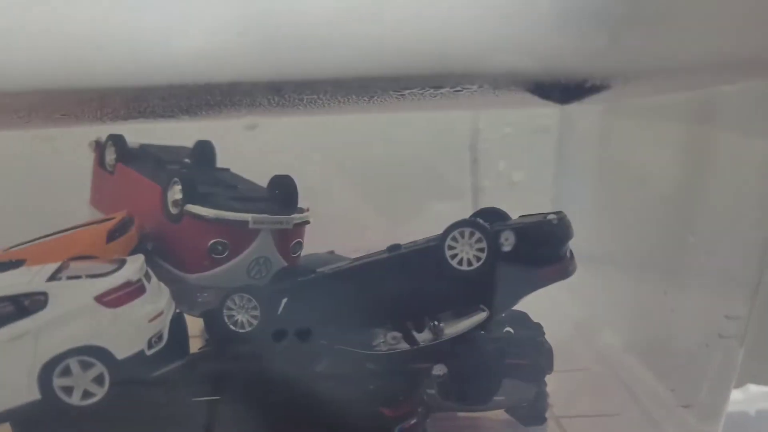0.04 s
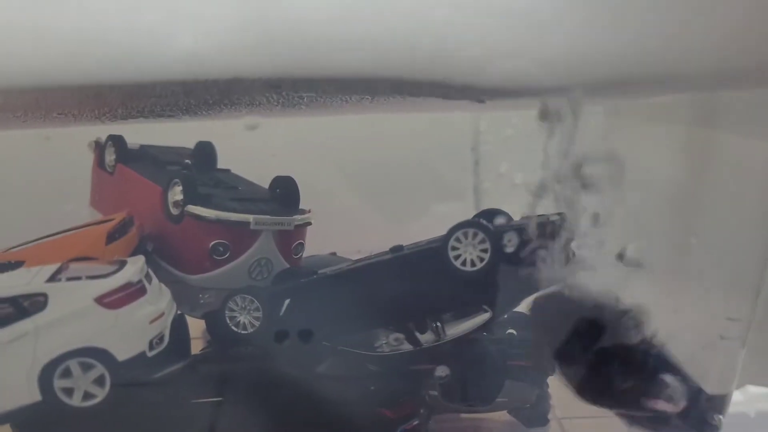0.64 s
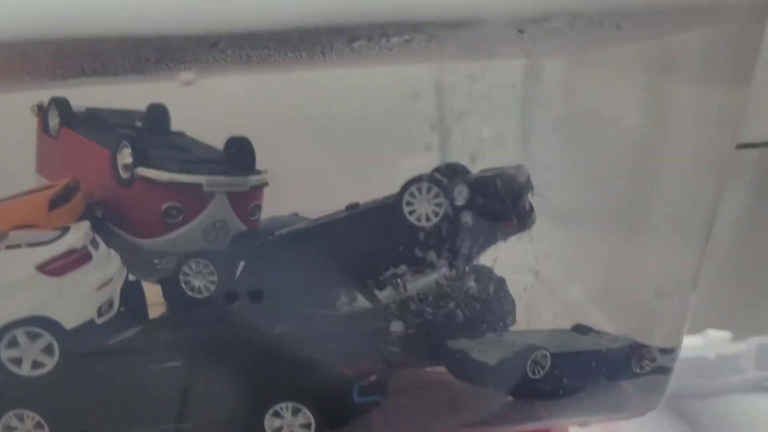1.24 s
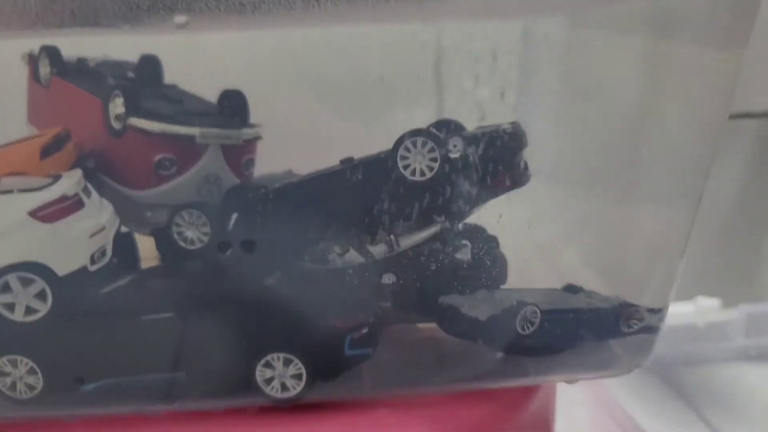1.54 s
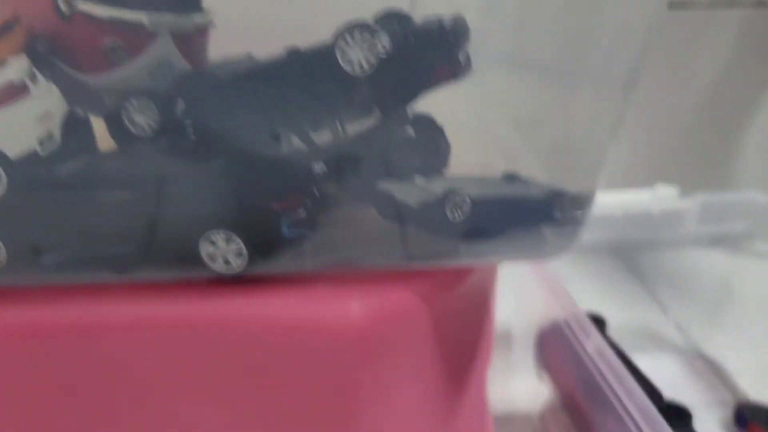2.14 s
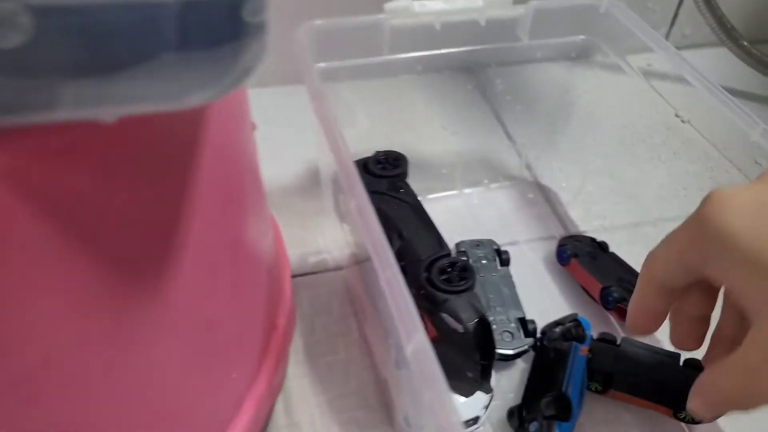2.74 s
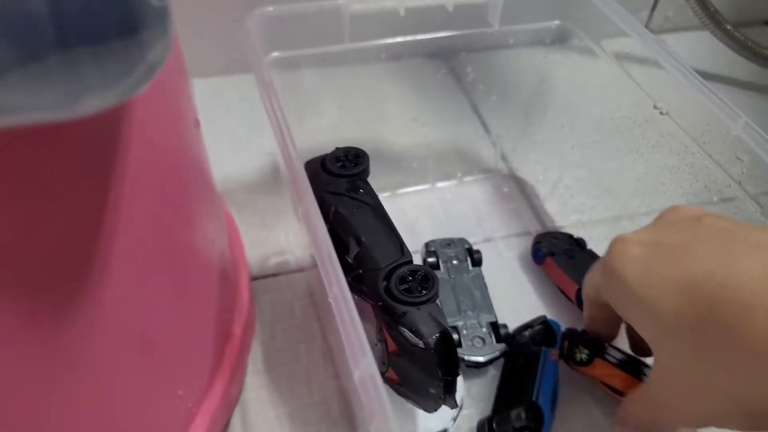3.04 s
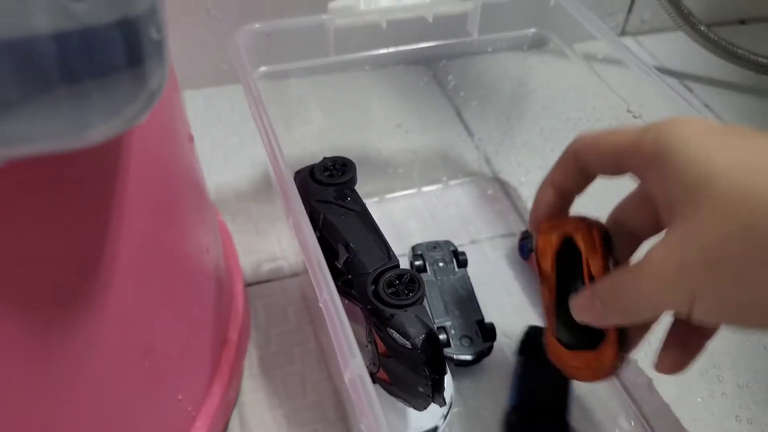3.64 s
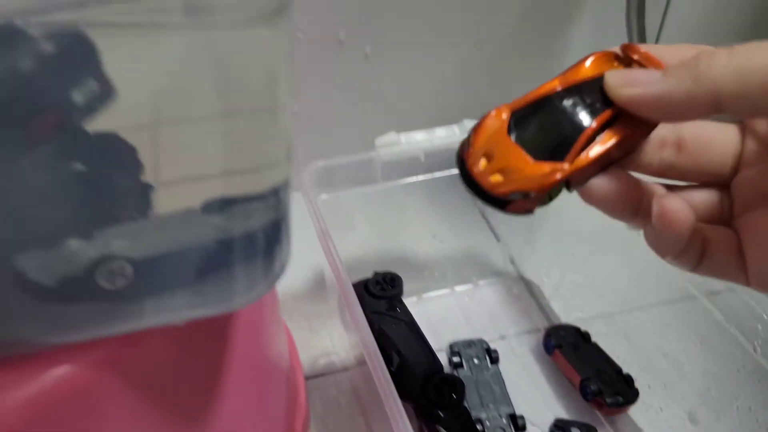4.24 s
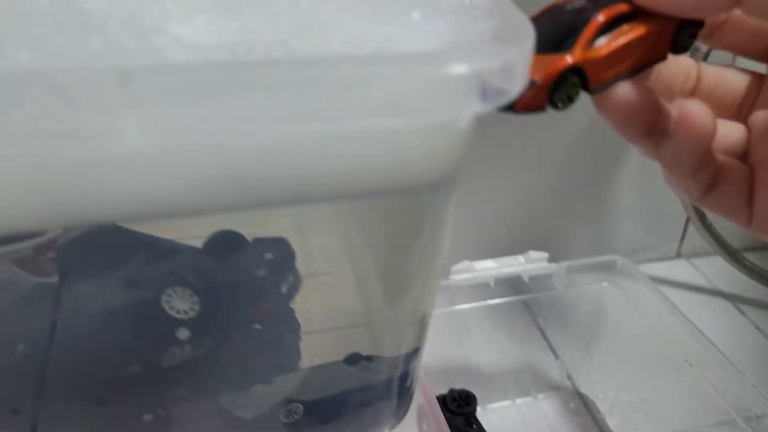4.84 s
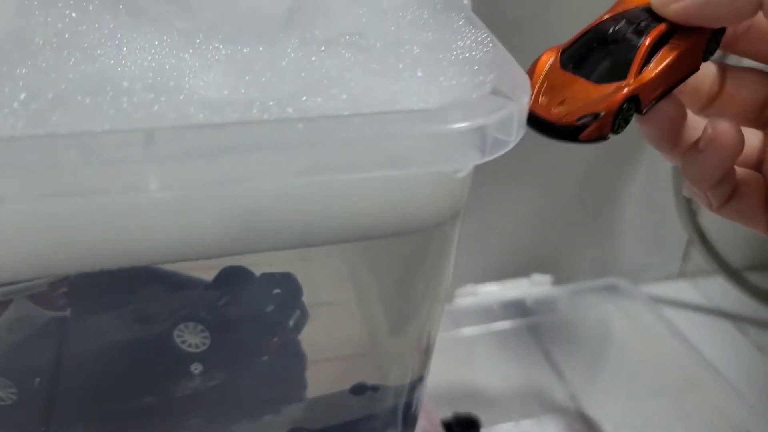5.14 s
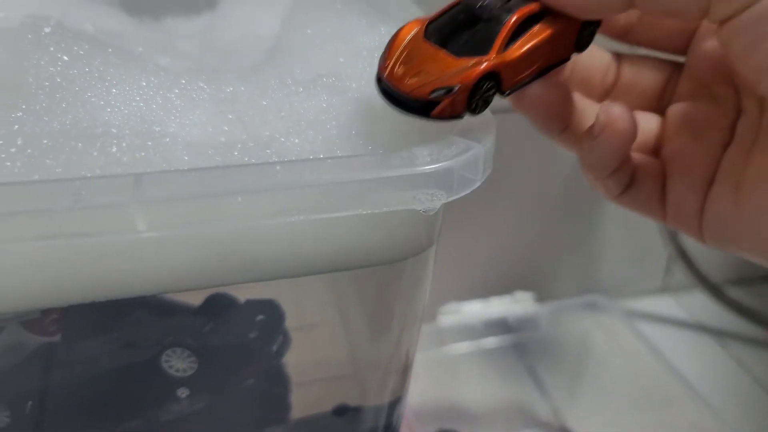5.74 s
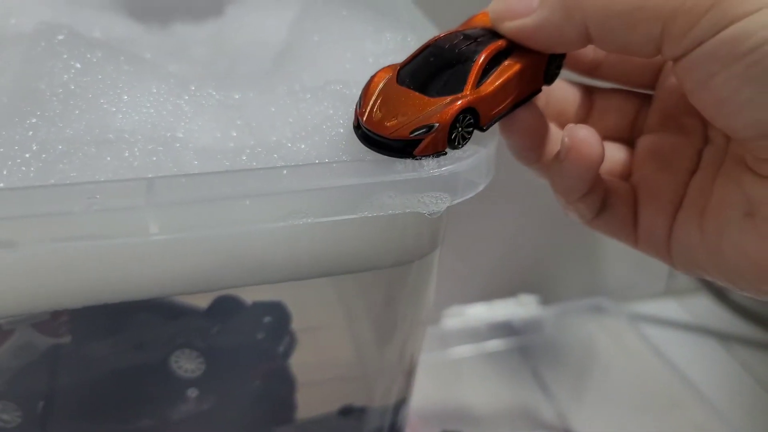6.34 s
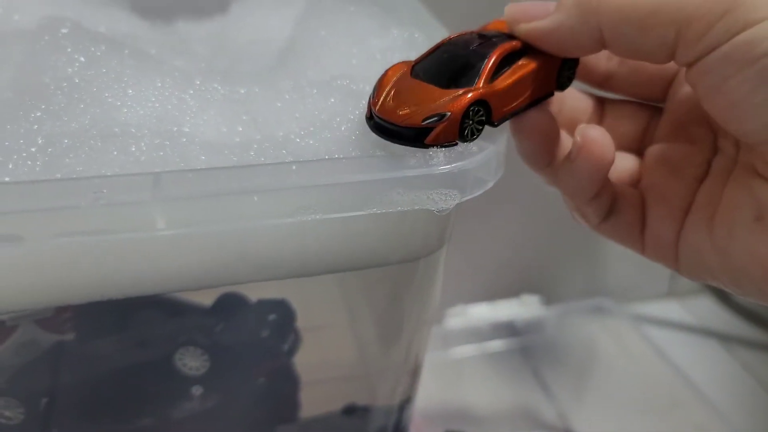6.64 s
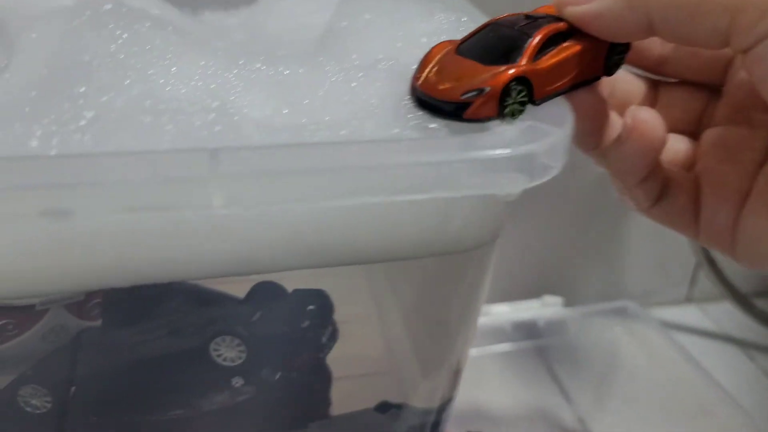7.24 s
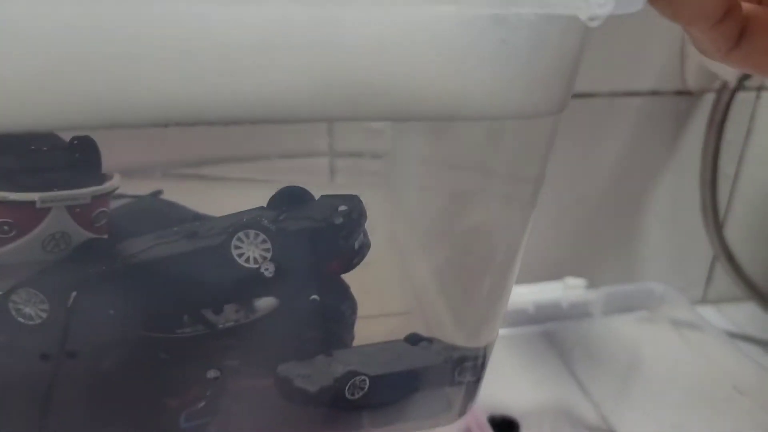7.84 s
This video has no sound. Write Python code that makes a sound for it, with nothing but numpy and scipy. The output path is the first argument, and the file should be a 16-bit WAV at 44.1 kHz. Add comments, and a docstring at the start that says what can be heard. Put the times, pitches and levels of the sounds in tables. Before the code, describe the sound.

Close up in a small tiled room with a faint low hum, a die-cast toy car bumps its way down a plastic tub of water, making short, booming knocks, the loudest sounds here. A quieter run of irregular clacks and scrapes follows as another car is picked out from others in a plastic tray. It ends with sparse, light ticks and brief pings of the metal car touching the tub's edge.

```python
"""Toy cars in a tub and a tray

A die-cast car drops into a plastic tub of foamy water and knocks its way down: the wall booms, air
pockets throb. Another is picked from a shallow plastic tray, which rattles on the floor, then tapped
and scuffed along the tub's rim, its metal shell pinging. Foam fizzes; a motor hums in a small tiled room."""
import sys
import numpy as np
from scipy import signal
from scipy.fft import rfft, irfft
from scipy.io import wavfile

SR = 44100
rng = np.random.default_rng(int(sys.argv[2]) if len(sys.argv) > 2 else 0)


def put_to_file(sound):
    """Save the sound as 16-bit audio at rate SR, in the file named by the first command-line argument."""
    columns = np.atleast_2d(sound).T  # one column per channel
    safe = np.clip(columns, -1, 1)
    whole_steps = np.round(safe * 32767)
    wavfile.write(sys.argv[1], SR, whole_steps.astype(np.int16))


N = 356769

# underwater blows on the tub:
# (time [s], clack [dB], knock [dB], tick [dB], spot pitch [Hz], rattle [s], wall boom [dB])
TUB_HITS = [(0.6251, -41, -41.5, -59.5, 1600, .001, -30), (0.672, -45.5, -38, -60, 1700, .001, -34),
            (0.7108, -35.5, -33, -47.5, 1670, .001, -21), (0.7422, -33, -26, -47.5, 1480, 0.0016, -7),
            (0.752, -44, -28.5, -51, 520, 0.0057, -32), (0.865, -47.5, -38, -65, 1620, 0.0017, -18),
            (0.872, -49, -33, -61.5, 500, 0.0062, -33), (1.0688, -57, -38, -86, 2700, .002, -18),
            (1.118, -76, -54, -94, 735, .002, -31.5)]
# finger-damped metal shell: (frequency [Hz], level [dB], t60 [s])
SHELL_MODES = [(2330, -2.5, .04), (2670, -8, .04), (3110, 2, .04), (3480, -7.5, .035), (5050, -1, .022),
               (5480, 0, .028)]


def amp(db):
    return 10 ** (np.asarray(db) / 20)


def unit_rms(x):
    return x / np.sqrt(np.mean(x ** 2) + 1e-20)


def curve_at(points, hz):
    point_hz, value = np.transpose(points)
    return np.interp(np.log(hz + 1), np.log(point_hz), value)


def add(mix, start_s, sound):
    part = mix[:, round(start_s * SR):][:, :sound.shape[1]]
    part += sound[:, :part.shape[1]]


def band(x, hz, kind, order=3):
    return signal.sosfilt(signal.butter(order, hz, kind, fs=SR, output="sos"), x)


def stereo_noise(size, coherence):
    left, other = rng.standard_normal((2, size))
    return np.array([left, coherence * left + np.sqrt(1 - coherence ** 2) * other])


def drift(rate_hz, size=4096):
    """Slow random curve, unit RMS."""
    hz = np.fft.rfftfreq(size, N / SR / size)
    slow = irfft(rfft(rng.standard_normal(size)) * np.exp(-(hz / rate_hz) ** 2), size)
    return unit_rms(np.interp(np.arange(N) * size / N, np.arange(size), slow))


def octave_decay(x, t60_at, drive=None):
    """Each octave of x is fed by drive (default: an impulse) and decays in t60_at(hz) seconds."""
    size = x.shape[1]
    drive = signal.unit_impulse(size) if drive is None else drive
    log_hz = np.log(np.fft.rfftfreq(size, 1 / SR) + 1)
    centres_hz = np.geomspace(125, 16000, 8)
    spectrum, out = rfft(x), 0
    for hz, selector in zip(centres_hz, np.eye(len(centres_hz))):
        octave = irfft(spectrum * np.interp(log_hz, np.log(centres_hz), selector), size)
        pole = np.exp(-2 * np.log(1000) / (SR * t60_at(hz)))
        out = out + octave * np.sqrt(signal.lfilter([1], [1, -pole], drive ** 2))
    return out


def minimum_phase(x, gain_points):
    """Causal filter: nothing sounds ahead of the blow."""
    size = x.shape[1]
    log_gain = np.log(amp(curve_at(gain_points, abs(np.fft.fftfreq(size, 1 / SR)))))
    response = np.exp(np.conj(signal.hilbert(log_gain)))
    return irfft(rfft(x) * response[:size // 2 + 1], size)


def contact_force(rattle_s, max_chatter_s, skid, size, grip_s=0.0019, hop_gap_s=0.006, count=14):
    """One touch: a strike with tiny rebounds, then ever weaker hops as the car rattles."""
    chatter_s = np.clip(0.7 * rattle_s, 0.0007, max_chatter_s)  # a clean hit ends sooner
    u = np.arange(size) / SR / chatter_s
    rebounds = rng.standard_normal(size) * (rng.random(size) < 9000 / SR) * u * np.exp(-u)
    strike = skid * chatter_s / grip_s * rebounds / (np.linalg.norm(rebounds) + 1e-9)
    strike[0] = 1
    hop_s = np.cumsum(hop_gap_s * rng.uniform(0.6, 1.4, count))
    hop_index = np.minimum(hop_s * SR, size - 1).astype(int)
    hops = signal.unit_impulse(size)
    hops[hop_index] = rng.choice([-1, 1], count) * np.exp(-hop_s / rattle_s)
    return signal.fftconvolve(strike, hops)[:size]


def plastic_ring(force, modes, modes_db, wall, t60_1khz_s, delay_1khz_s, coherence):
    """A contact rings a plastic box: distinct modes over a crowd of short-lived wall modes."""
    size = len(force)
    t, hz = np.arange(size) / SR, np.fft.rfftfreq(size, 1 / SR)
    flex = octave_decay(stereo_noise(size, coherence), lambda f: t60_1khz_s * (1000 / f) ** 0.43, force)
    flex = minimum_phase(flex, wall)
    mode_hz, db, t60_s = np.transpose(modes)[:, :, None]
    mode_hz = mode_hz * (1 + 0.03 * rng.standard_normal(db.shape))  # the cars' shifting weight retunes
    phase = 2 * np.pi * rng.random(db.shape) + rng.standard_normal((2, len(db), 1))
    spot_db = 2 * rng.standard_normal(db.shape)  # each spot favours other modes
    envelope = amp(db + spot_db) * np.exp(-np.log(1000) * t / t60_s)
    ring = (envelope * np.sin(2 * np.pi * mode_hz * t + phase)).sum(1)
    ring = signal.fftconvolve(ring, force[None], axes=1)[:, :size]
    body = unit_rms(flex) + amp(modes_db) * unit_rms(ring)
    dispersion = np.exp(-4j * np.pi * delay_1khz_s * np.sqrt(1000 * hz))  # low bending waves lag
    fade = np.minimum(np.linspace(10, 0, size), 1)
    return irfft(rfft(body) * dispersion, size) * fade


def blows(hits, max_chatter_s, skid, spot_gain, stiffness, left_lag_s, pan_db, **box):
    """Each blow: low knock of the box, wall clack, bright metal tick and the struck spot's note."""
    out = np.zeros((2, N))
    for start_s, clack_db, knock_db, tick_db, spot_hz, rattle_s, *_ in hits:
        ring = plastic_ring(contact_force(rattle_s, max_chatter_s, skid, size=6144), **box)
        clack_low_hz = np.clip(stiffness * spot_hz, 1150, 2200)  # a stiff spot has less body
        knock = amp(knock_db) * unit_rms(band(ring, [110, 1100], "band", order=4))
        clack = amp(clack_db) * unit_rms(band(ring, [clack_low_hz, 4400], "band", order=4))
        tick = amp(tick_db) * unit_rms(band(ring, 4700, "high"))
        note = unit_rms(band(ring, [spot_hz / 1.172, spot_hz * 1.227], "band", order=2))
        note_gain = spot_gain * amp(knock_db if spot_hz < 900 else clack_db)
        add(out, start_s, knock + clack + tick + note_gain * note)
    out[0] = np.roll(out[0], round(left_lag_s * SR))
    return amp([[pan_db / 2], [-pan_db / 2]]) * out


def tub_knocks():
    """The sinking car strikes the water-filled tub."""
    # tub resonances: (frequency [Hz], level [dB], t60 [s])
    modes = [(207, -14, 0.11), (273, -9, 0.17), (330, -7, 0.18), (402, -8, 0.19), (507, -4, .15),
             (653, -5.5, .08), (673, -7, .06), (733, -4.5, .04), (1250, -4, 0.016), (1615, 6.5, 0.012),
             (1990, 3.5, 0.013)]
    # dense wall modes: (frequency [Hz], spectral density [dB])
    wall = [(100, -19.5), (200, 1.5), (500, 2), (740, 1.5), (1000, -18), (1600, -11.5), (2800, -11.5),
            (4000, -20), (7000, -25), (10000, -42), (16000, -65)]
    return blows(TUB_HITS, max_chatter_s=0.0007, skid=1.0, spot_gain=0.3, stiffness=0.4,
                 modes=modes, modes_db=-2.5, wall=wall, t60_1khz_s=0.037, delay_1khz_s=0.0014,
                 left_lag_s=-0.0004, pan_db=2, coherence=0.61)


def wall_booms(start_hz=780, swell_s=0.0022, sag=0.3, sag_s=0.009, right_lag_s=0.0003):
    """The water-backed wall booms for a few cycles; pitch sags as the bending wave spreads."""
    out = np.zeros((2, N))
    t = np.maximum(np.arange(4096) / SR - np.array([[0], [right_lag_s]]), 0)
    u = t / swell_s
    cycles = start_hz * ((1 - sag) * t + sag * sag_s * (1 - np.exp(-t / sag_s)))
    for start_s, *_, boom_db in TUB_HITS:
        add(out, start_s, amp(boom_db) * u * np.exp(1 - u) * np.sin(2 * np.pi * cycles))
    return out


def water_heaves():
    """Air pockets throb for a few cycles behind the sinking car."""
    # air pockets: (time [s], level [dB], pitch [Hz], swell [s])
    pockets = [(0.719, -26, 214, 0.014), (0.747, -14.5, 162.6, 0.0086), (0.777, -26, 215, 0.005),
               (0.883, -14.5, 182, 0.0052)]
    out, t = np.zeros((2, N)), np.arange(SR // 4) / SR
    for start_s, db, hz, swell_s in pockets:
        u = t / swell_s
        add(out, start_s, amp([[db + 2.0], [db - 2.5]]) * u * np.exp(1 - u) * np.sin(2 * np.pi * hz * t))
    return out


def tray_clatter(rock_start_s=4.2225, rock_gap_s=0.028, rock_hz=1470, rock_rattle_s=0.006):
    """Cars hit each other and the tray; let go, it rocks to rest on the floor."""
    # car blows: (time [s], clack [dB], knock [dB], tick [dB], spot pitch [Hz], rattle [s])
    hits = [(2.9652, -43, -40.5, -51, 1260, 0.0056), (2.9884, -47, -38.5, -55, 2740, 0.0033),
            (2.9935, -50, -44, -62, 1500, 0.0045), (2.9995, -49, -40, -58, 836, 0.0036),
            (3.0166, -53, -44, -63, 1200, 0.0053), (3.0255, -52.5, -43, -73, 774, 0.0056),
            (3.0445, -55, -66, -64, 990, 0.0085), (3.2135, -51.5, -55, -52, 2850, 0.022),
            (3.2605, -48, -42, -60, 2130, 0.0047), (3.2725, -40.5, -38, -45.5, 1720, 0.0033),
            (3.2815, -40.5, -34.5, -51, 765, 0.0017), (3.297, -61, -63, -61, 2420, 0.0045),
            (3.3448, -52, -44, -52.5, 5560, 0.0021), (3.406, -58, -77, -66, 1930, 0.0044),
            (3.4195, -46.5, -50.5, -58.5, 1420, 0.011), (3.5046, -48, -56, -62, 2740, 0.002),
            (3.638, -52, -51.5, -73, 1610, 0.0036), (3.7452, -61.5, -50, -78, 1540, 0.009),
            (3.7621, -54.5, -45, -73, 1410, 0.014), (3.775, -48.5, -39, -65, 1400, 0.0069),
            (3.7858, -47, -34, -43, 1740, 0.0022), (3.788, -36, -26, -65, 765, 0.00075),
            (3.8075, -43, -35, -48.5, 1630, 0.019), (3.8528, -49, -43, -51.5, 1210, 0.0016),
            (3.9055, -60.5, -56, -55.5, 2640, 0.0014), (3.9385, -49, -41.5, -52, 1890, 0.0048),
            (3.968, -45, -39.5, -54, 2520, 0.0038), (3.98, -53, -39.5, -52, 814, 0.0024),
            (4.0138, -53.5, -44.5, -68, 1700, 0.0071), (4.0484, -48, -36, -52, 1330, 0.0027),
            (4.069, -51.5, -45, -73, 766, 0.00088), (4.0834, -52, -51, -57, 1490, 0.0016),
            (4.1228, -60, -46, -75, 1320, .001), (4.1425, -41.5, -38, -51, 1820, 0.0021),
            (4.1495, -53, -47, -67, 1880, .001), (4.1895, -51, -38, -54.5, 1150, 0.0026)]
    # tray resonances: (frequency [Hz], level [dB], t60 [s])
    modes = [(259, -13.5, .13), (398, -5, .05), (464, 3, .06), (578, -2.5, .05), (702, 1.5, .07),
             (752, 4.5, .047), (806, 4, .05), (876, 4, .055), (946, -1, .055), (1235, -4, .04),
             (1605, 3, .04), (1905, 7, .055), (2650, 0, .07)]
    # dense wall modes: (frequency [Hz], spectral density [dB])
    wall = [(100, -14.5), (320, -12.5), (470, -6), (820, -5), (1100, -8.5), (1600, -4), (2300, -3.5),
            (3600, -13), (6500, -13), (9500, -21.5), (15000, -18)]
    first_db, loss_db = np.array([-55, -46, -63]), np.array([2.5, 4, 4.5])  # clack, knock, tick
    rocks = [(rock_start_s + k * rock_gap_s, *(first_db - k * loss_db), rock_hz, rock_rattle_s)
             for k in range(4)]
    return blows(hits + rocks, max_chatter_s=0.0018, skid=1.16, spot_gain=0.29, stiffness=0.51,
                 modes=modes, modes_db=-5, wall=wall, t60_1khz_s=0.022, delay_1khz_s=0.0006,
                 left_lag_s=0.00045, pan_db=0.4, coherence=0.043)


def rim_taps():
    """The held car taps and skids on the tub's rim."""
    # taps: (time [s], clack [dB], knock [dB], tick [dB], spot pitch [Hz], rattle [s])
    hits = [(4.8218, -58, -47, -59.5, 1640, 0.00075), (4.887, -71, -49.5, -57.5, 1390, 0.0043),
            (4.908, -64, -76.5, -54.5, 2980, 0.0093), (5.9002, -58, -79, -58, 3300, 0.0023),
            (5.9045, -56, -67.5, -47, 2710, 0.0026), (6.553, -69.5, -78, -63, 1760, .003),
            (6.659, -57.5, -70, -53.5, 2720, .002), (6.6625, -51, -63.5, -41, 2600, 0.0029),
            (6.824, -68, -66.5, -59.5, 2650, 0.0018), (7.2487, -64, -84, -62, 2900, 0.00078),
            (7.2803, -57, -46.5, -53, 1260, 0.0036), (7.303, -60.5, -61, -55, 1620, 0.0037),
            (8.0505, -49.5, -54, -43.5, 2890, 0.0016), (8.0566, -45.5, -59, -56, 1630, 0.0014)]
    # rim resonances: (frequency [Hz], level [dB], t60 [s])
    modes = [(468, -1, 0.046), (688, 1.5, 0.032), (1240, 2, 0.044), (1470, 12, 0.038), (1824, 2, 0.023),
             (2116, -1.5, 0.041), (2760, 19, 0.0089), (3960, -8, 0.034)]
    # dense wall modes: (frequency [Hz], spectral density [dB])
    wall = [(100, -14.5), (300, -4.5), (520, -7.5), (730, 4), (980, -14), (1500, -5.5), (2000, 8),
            (3200, 3.5), (5200, 0), (6500, 3), (9000, -6.5), (12000, -6.5), (15500, 0.5)]
    return blows(hits, max_chatter_s=0.0015, skid=4.1, spot_gain=0.88, stiffness=0.55,
                 modes=modes, modes_db=-8.5, wall=wall, t60_1khz_s=0.02, delay_1khz_s=0.00059,
                 left_lag_s=-0.0001, pan_db=1.3, coherence=0.54)


def slide_pressure(grip_db_per_s=1097, slow_db_per_s=130, stop_db_per_s=264):
    """Each slide grips quickly, weakens as the car slows and dies away once it stops."""
    # slides over other cars, then along the rim: (time [s], length [s], level [dB])
    slides = [(2.941, .005, -55.5), (2.975, 0.023, -41), (3.147, 0.016, -59), (3.208, 0.024, -58),
              (3.28, .005, -36), (3.451, 0.036, -52), (3.568, .002, -57.5), (3.8, 0.044, -37),
              (3.981, 0.026, -44), (4.063, .05, -51.5), (4.147, 0.11, -54), (4.832, 0.04, -49.5),
              (4.893, 0.016, -53), (4.986, .003, -67), (5.085, 0.017, -67.5), (7.28, .002, -42.5),
              (8.051, 0.006, -41.5)]
    t, out = np.arange(N) / SR, np.zeros(N)
    for start_s, length_s, db in slides:
        near = abs(t - start_s) < 0.5
        age_s = t[near] - start_s
        out[near] += amp(db - grip_db_per_s * np.maximum(-age_s, 0)
                         - slow_db_per_s * np.maximum(age_s, 0)
                         - stop_db_per_s * np.maximum(age_s - length_s, 0))
    return out


def scrape(slips_per_s=1100, spread_db=0.5, slip_decay_s=0.00066):
    """Wheels and edges catch and slip; each slip ticks the plastic."""
    slips = (rng.random(N) < slips_per_s / SR) * amp(spread_db * np.minimum(rng.exponential(1, N), 3))
    energy = signal.lfilter([1], [1, -np.exp(-1 / (SR * slip_decay_s))], slips ** 2)
    ticks = band(stereo_noise(N, coherence=0.24) * np.sqrt(energy), 1700, "high", order=2)
    softened = band(ticks, 3000, "low", order=1) + 0.39 * ticks
    return slide_pressure() * unit_rms(softened)


def shell_pings(width_octaves=0.36, attack_s=0.00055):
    """The car's metal shell pings briefly as it touches the tray, other cars or the tub's rim."""
    # shell pings: (time [s], level [dB], centre [Hz])
    touches = [(3.152, -52.5, 5430), (3.346, -41, 5430), (3.507, -30.5, 2550), (4.91, -46, 3180),
               (4.993, -54.5, 5430), (5.08, -56, 4250), (5.9063, -32, 5430), (6.663, -39, 5400)]
    out, t = np.zeros((2, N)), np.arange(8192) / SR
    hz, db, t60_s = np.transpose(SHELL_MODES)[:, :, None]
    for start_s, ping_db, centre_hz in touches:
        share = np.exp(-(np.log2(hz / centre_hz) / width_octaves) ** 2)
        phase = 2 * np.pi * rng.random(hz.shape) + 0.5 * rng.standard_normal((2, len(hz), 1))
        envelope = share * amp(ping_db + db) * np.exp(-np.log(1000) * t / t60_s)
        ring = (envelope * np.sin(2 * np.pi * hz * t + phase)).sum(1)
        add(out, start_s, ring * (1 - np.exp(-t / attack_s)))
    return out


def shell_resonance(drive):
    """Knocks and rubs set the car's metal shell ringing faintly."""
    return sum(amp(db) * signal.lfilter(*signal.iirpeak(hz, np.pi * hz * t60_s / np.log(1000), SR), drive)
               for hz, db, t60_s in SHELL_MODES)


def foam_fizz(grains_per_s=1500, floor_db=-82.5, flutter_db=2):
    """Fine-grained fizz that swells when fingers brush foam or plastic."""
    # finger brushes: (time [s], half length [s], level [dB])
    brushes = [(.174, 0.01, -73), (.228, 0.0075, -72), (.358, 0.0076, -67.5), (.575, 0.05, -72),
               (2.415, 0.0093, -70.5), (7.202, 0.01, -68), (7.55, 0.13, -80), (8.06, 0.059, -66)]
    t = np.arange(N) / SR
    grains = (rng.random((2, N)) < grains_per_s / SR) * rng.standard_normal((2, N))
    swells = sum(amp(db) * np.exp(-((t - peak_s) / half_s) ** 2) for peak_s, half_s, db in brushes)
    level = (amp(floor_db) + swells) * amp(flutter_db * drift(20))
    return level * unit_rms(band(grains, [3000, 8500], "band", order=2))


def tile_reflections(size=24000, taps_per_s=8000, onset_s=0.0015):
    """Close tiled walls answer fast and ring briefly; long waves reach both sides alike."""
    # room decay: (frequency [Hz], t60 [s])
    decay = [(150, 0.46), (500, 0.19), (1500, 0.16), (5000, 0.16), (9000, 0.18), (15000, 0.14)]
    t = np.arange(size) / SR
    taps = rng.choice([-1., 1.], (2, size)) * (rng.random((2, size)) < taps_per_s / SR)
    taps = band(taps[0], 214, "low") + band(taps, 150, "high")
    tail = octave_decay(taps, lambda hz: curve_at(decay, hz)) * (1 - np.exp(-(t / onset_s) ** 2))
    return tail / np.linalg.norm(tail, axis=1, keepdims=True)


def room_echoes(x, sway_hz=0.9):
    """Two reflection patterns alternate as the listening point sways."""
    angle = 2 * np.pi * sway_hz * np.arange(N) / SR
    return sum(signal.fftconvolve(x * share, tile_reflections(), axes=1)[:, :N]
               for share in (np.cos(angle), np.sin(angle)))


def motor_hum():
    """A motor beyond the wall: wavering low tones, nearly centred."""
    # motor tones: (frequency [Hz], level [dB], waver [Hz])
    tones = [(76.55, -50, 1.93), (120.1, -54, 0.62), (161.2, -60, 1.5), (173.3, -60, 1.7),
             (197.2, -57.5, 0.64), (241.6, -61, 2.214), (363, -68.5, 0.34), (400.4, -71.5, 0.75)]
    out = np.zeros(N)
    for hz, db, waver_hz in tones:
        cycles = np.cumsum(hz + waver_hz * drift(10.5)) / SR + rng.random()
        out += amp(db) * unit_rms((1 + 0.27 * drift(11)) * np.sin(2 * np.pi * cycles))
    return amp([[0.9], [-0.9]]) * out


def room_noise(ripple_db=3.5, above_310hz_db=-65.0):
    """Steady noise rippled by standing waves; shared bass, separate hiss left and right."""
    # noise spectrum: (frequency [Hz], spectral density [dB])
    spectrum = [(20, -19.5), (48, -6.5), (63, 2), (90, -1), (135, -10.5), (170, -2), (225, -12.5),
                (265, -12), (310, -18), (450, -22), (800, -27.5), (1500, -30.5), (3000, -40.5),
                (5000, -50.5), (9000, -59), (16000, -49)]
    hz = np.fft.rfftfreq(N, 1 / SR)
    left, other = rfft(rng.standard_normal((2, N)))
    coherence = curve_at([(100, 0.98), (300, 0.4), (800, 0.12), (3000, 0.053)], hz)
    right = coherence * left + np.sqrt(1 - coherence ** 2) * other
    nodes_hz = np.geomspace(300, 3500, 180)
    ripple = np.interp(hz, nodes_hz, rng.standard_normal(len(nodes_hz)), left=0, right=0)
    noise = irfft(np.array([left, right]) * amp(curve_at(spectrum, hz) + ripple_db * ripple), N)
    upper_rms = band(noise.mean(0), 310, "high", order=8).std()
    return amp(above_310hz_db) * amp([[0.7], [-0.7]]) * noise / upper_rms


def scene():
    """Tub, tray and rim in the tiled room, over hum and room noise."""
    tub, tray, rim = tub_knocks(), tray_clatter(), rim_taps()
    throbs = water_heaves() + wall_booms()
    sliding = scrape()
    metal = shell_pings() + shell_resonance(amp(1.5) * sliding + amp(-9.5) * tray + amp(-19) * rim)
    send = amp(-5) * tub + amp(-11) * throbs + amp(-3) * (tray + sliding + metal) + amp(-2.5) * rim
    echoes = room_echoes(send + foam_fizz())  # fizz is heard only via the walls
    return tub + throbs + tray + rim + sliding + metal + echoes + motor_hum() + room_noise()


def record(dry, cutoff_hz=15900):
    """Steep low-pass."""
    lowpass = signal.firwin(401, cutoff_hz, window=("kaiser", 8), fs=SR)
    return signal.oaconvolve(dry, lowpass[None], "same")


dry = scene()
out = record(dry)
put_to_file(out)
```